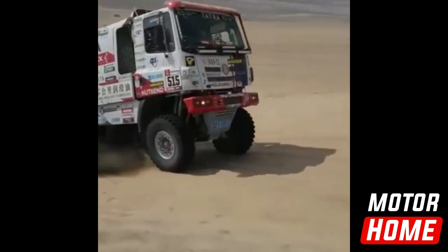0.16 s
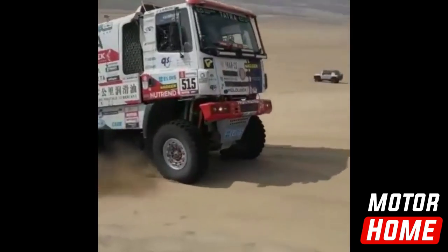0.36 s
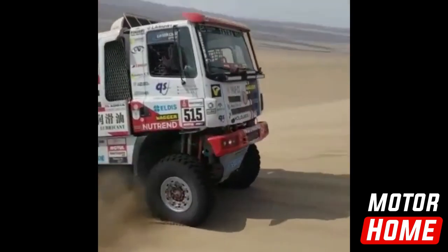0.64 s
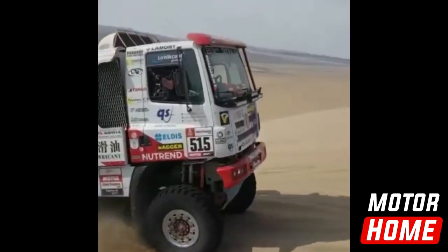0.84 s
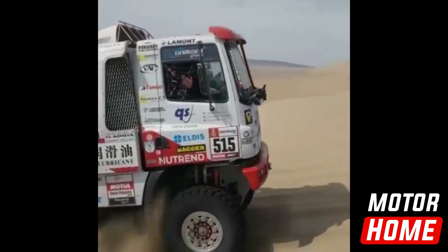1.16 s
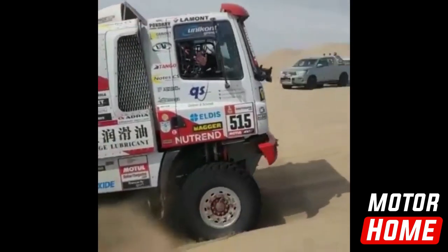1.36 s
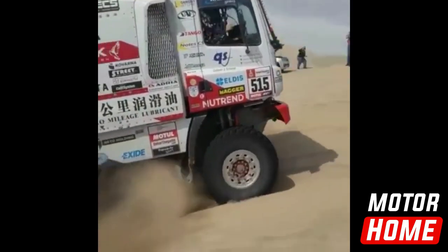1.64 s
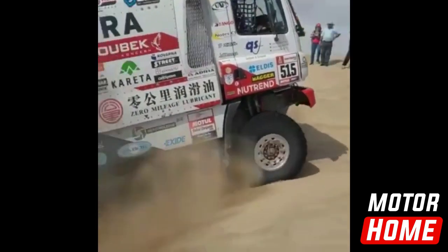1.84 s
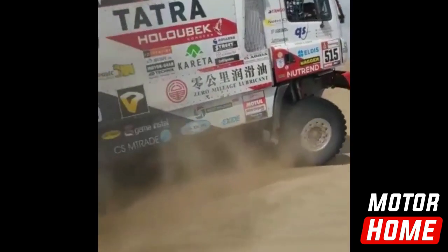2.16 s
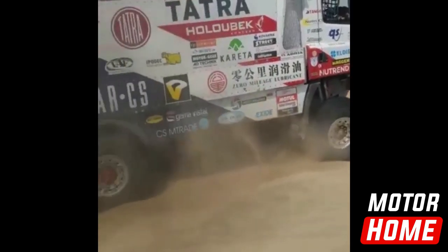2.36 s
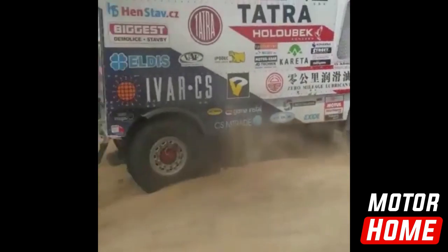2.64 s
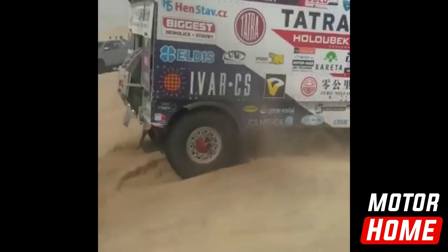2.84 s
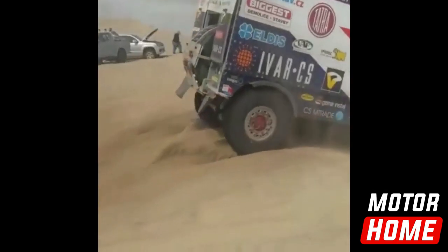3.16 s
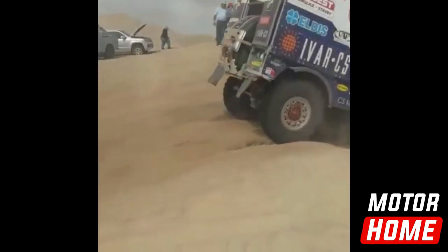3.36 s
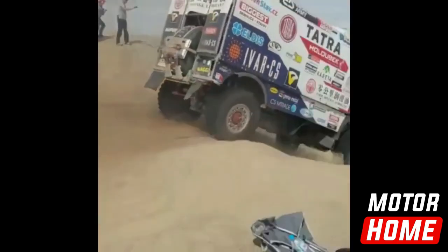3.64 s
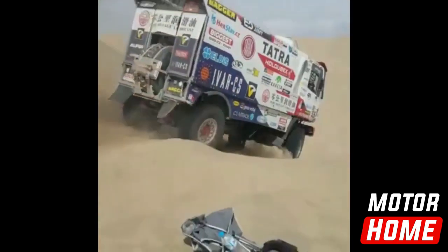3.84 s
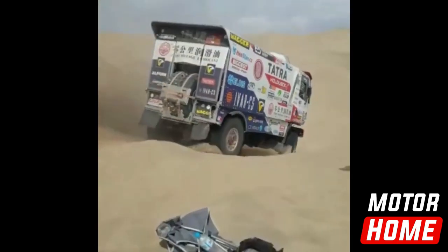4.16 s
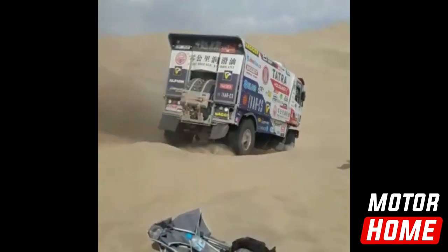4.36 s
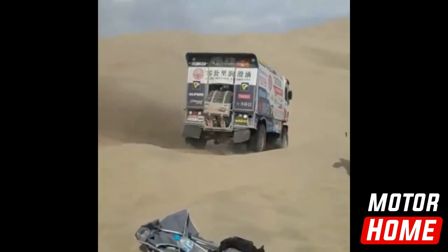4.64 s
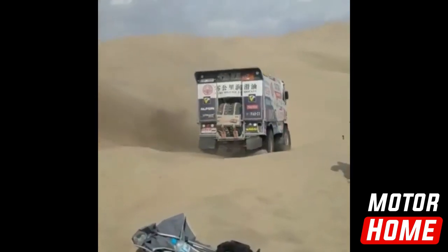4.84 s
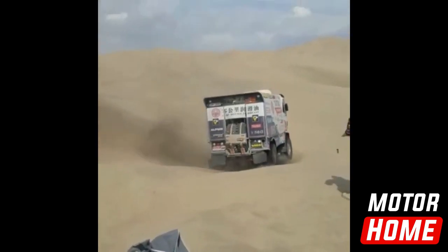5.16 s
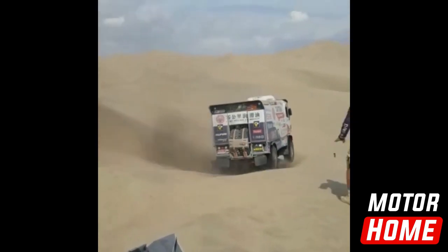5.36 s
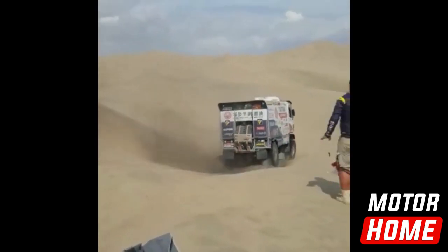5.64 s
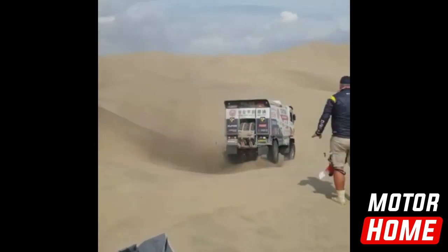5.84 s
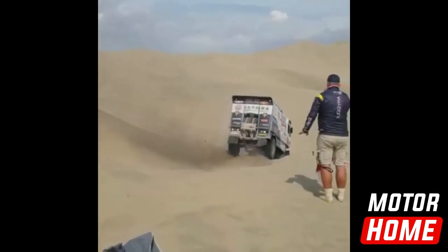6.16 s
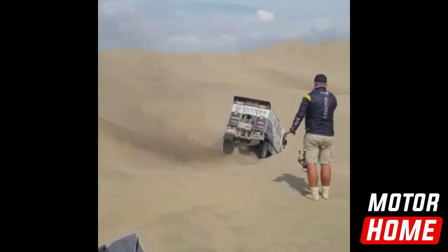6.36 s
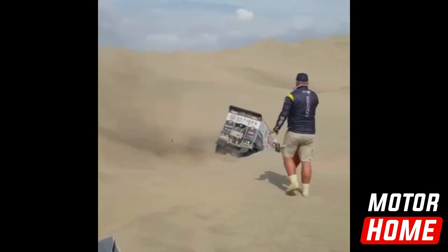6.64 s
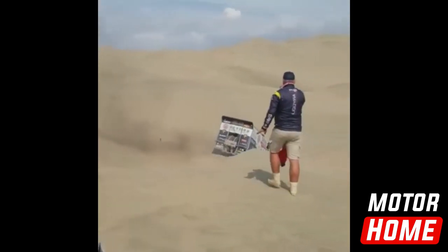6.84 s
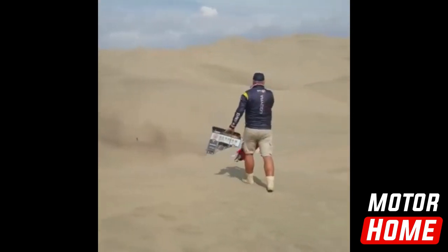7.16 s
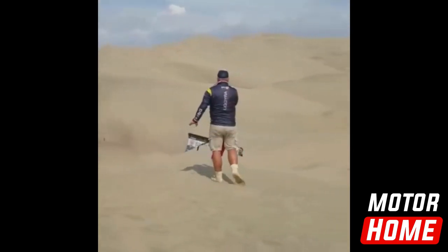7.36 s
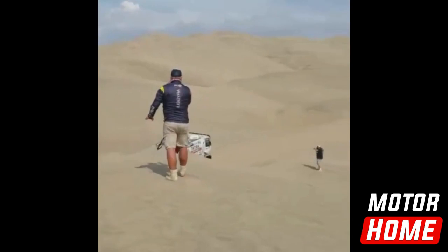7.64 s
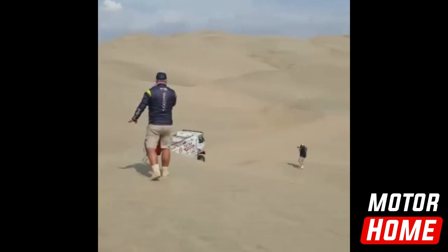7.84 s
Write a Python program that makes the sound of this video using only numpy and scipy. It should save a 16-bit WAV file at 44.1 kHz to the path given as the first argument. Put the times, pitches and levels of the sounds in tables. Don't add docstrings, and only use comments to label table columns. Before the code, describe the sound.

Open dunes, dry air, a phone microphone close to a passing heavy diesel truck. From 0 to 1.3 s the engine pulls hard, a buzzing drone that dips then climbs, with wavering gear whine and gas hiss. The throttle lifts and pitch falls; a short stab at 1.5-1.9 s, then it sinks to a low chug around 2.5 s. At 2.6-3.2 s a sudden stamp spits crackling, separate exhaust beats; a sharper one follows at 3.6-4.1 s with faint turbo whistle, and a smoother surge at 4.4-4.9 s. Metal squeaks around 4.85-5 s as strong wind slaps batter the left side. After 5.3 s the engine nearly vanishes; fine sand sifts and faintly sings, strongest about 6.3-7 s. From 7.05 s the distant engine revs upward and holds, weak beneath renewed left-heavy gusts and small snaps until 8 s. The treble is ragged and thinned.

```python
import sys
import numpy as np
from scipy import signal
from scipy.io import wavfile
from scipy.ndimage import uniform_filter1d

SR = 44100
rng = np.random.default_rng(int(sys.argv[2]) if len(sys.argv) > 2 else 0)


def magnitude_from_level(level_db):
    exponent = np.asarray(level_db, float) / 20
    return 10 ** exponent


def wav_record(signal):
    frames = np.transpose(np.atleast_2d(signal))
    bounded = np.clip(frames, -1, 1)
    quanta = np.round(bounded * 32767).astype(np.int16)
    wavfile.write(sys.argv[1], SR, quanta)


N = 352800

# (time [s], firings [Hz])
ENGINE_SPEED = [(0.0, 91.3), (0.08, 94.77), (0.48, 84.4), (0.66, 91.9), (0.81, 104.7), (0.97, 110.6),
                (1.23, 110), (1.39, 98.06), (1.52, 72.44), (1.58, 62.6), (1.75, 67.43), (1.96, 78.5),
                (2.25, 47), (2.5, 40.4), (2.7, 46.9), (2.82, 50.1), (3.09, 50.1), (3.18, 47.4), (3.36, 40),
                (3.6, 47.6), (3.8, 56.13), (4.0, 66.3), (4.17, 60.1), (4.31, 53.65), (4.48, 61.16),
                (4.65, 70.25), (4.92, 73.84),
                (5.3, 68.3), (6.2, 60.86), (7.04, 75.03), (7.24, 85.94), (7.5, 91.05), (7.62, 97.1),
                 (7.7, 102.4), (7.79, 107.2), (8.0, 106)]
# (down [s], up [s], time to open [s], exhaust on opening [dB], exhaust at the lift [dB])
THROTTLE = [
    (-0.1, 1.269, 0.049, -12.5, -18.5),
    (1.538, 1.944, 0.04, -28.5, -20.5),
    (2.626, 3.181, 0.014, -22.5, -23.5),
    (3.605, 4.065, 0.0078, -26.5, -24),
    (4.377, 4.88, 0.066, -19, -17),
    (7.053, 8.092, 0.098, -28.5, -31),
]
# (time [s], level [dB])
IDLE_LEVEL = [(1.45, -29.5), (1.54, -31.5), (1.9, -32.5), (2.4, -29.5), (2.62, -30), (3.32, -33),
              (3.39, -30.5), (3.45, -33), (3.55, -29.5), (4.2, -26.5), (4.3, -30.5), (4.37, -27.5),
              (5.0, -23.5), (5.3, -42.5), (5.8, -57), (7.0, -52)]
DRONE_RELEASE_S, GAS_RELEASE_S = 0.13, 0.15
# (pitch [Hz], level [dB])
PIPE_TONE = [(40, -7), (52, -12), (65, -4), (80, -2.5), (105, 1.9), (150, 1), (175, 5), (225, -0.5)]
# (time [s], second tone [dB], third tone relative to the second [dB])
PIPE_HEADING = [(0, -4, -19.5), (2.5, -1.2, -11.5), (3.7, 1.5, -30), (4.4, -2.5, -10), (4.9, -3, -14),
                (5.2, -0.5, -5.5), (7.2, -4.5, -18), (7.5, -10.5, -21), (8, -3, -15)]

# (pitch [Hz], level [dB])
ROAR_COLOUR = [(120, -10), (250, 0), (370, -13), (500, -6), (750, -6.5), (1100, -15), (1500, -3.5),
               (2200, -12), (3500, -38.5)]
ROAR_DB, FAR_ROAR_DB = -8, -50
ROAR_JET_SHARE = 0.46
# (time [s], hiss over exhaust [dB], how far firings chop it [0-1], its top end [dB])
GAS_JET = [(0, -11.5, 0.31, -24.5), (0.6, -2.5, 0.39, -29.5), (0.95, 0, 0.12, -24), (1.34, 2, 0.35, -28.5),
           (1.5, 3, 0.4, -22.5), (1.7, 1.5, 0.8, -23), (1.9, -1, 0.4, -26.5), (2.5, -3, 0.98, -21),
           (3.08, -9, 0.3, -21), (3.3, -5.5, 0.4, -22.5), (3.7, -3.5, 0.42, -26), (3.86, -1, 0.2, -22.5),
           (4.05, -5.5, 0.13, -22), (4.5, -8.5, 0, -25), (5.0, -14.5, 0.05, -18.5), (5.5, 5, 0, -20),
           (7.0, -26, 0.08, -15)]
IDLE_CHOP = 0.45
# (pitch [Hz], level [dB])
HISS_LEFT = [(900, -9.5), (1500, -12), (2600, -6), (3300, -0.5), (3900, -0.5), (4800, -9), (5700, -17.5),
             (6300, -52.5), (8000, -81)]
HISS_RIGHT = [(900, -11.5), (1500, -16), (2200, -8.5), (3000, -19.5), (4000, -11.5), (5000, -13),
              (5700, -17.5), (6300, -20.5), (8000, -64)]
# (pitch [Hz], level [dB])
TOP_LEFT = [(4300, -19), (4900, 8), (5500, 9.5), (6500, 7.5), (8000, 4.5), (10000, 0.5), (11200, 1.5),
            (12500, -2.5), (14000, -95)]
TOP_RIGHT = [(4300, -38), (4900, -4), (5500, 12.5), (6500, -54), (8000, 1.5), (10000, 3), (11200, -9),
             (12500, 8.5), (14000, -35)]
CRACK_TIMES = [
    2.644,
    2.788,
    2.985,
    3.584,
    3.83,
]
CRACK_LEVELS = [4.2, 0.31, 2.7, 5.6, 1.9]
CRACK_FADE_S = 0.043
# (time [s], extra level [dB])
SPITS = [(2.624, -3), (2.644, 2.5), (2.669, 3), (2.688, 6.5), (2.709, 1), (2.728, 4), (2.749, 6.5),
         (2.77, -9), (2.791, -0.5), (2.808, 3.5), (2.828, -2), (2.849, -2), (2.868, 4), (2.889, 0.1),
         (2.908, 0), (2.928, 5.5), (2.948, 4.5), (2.967, 2), (2.985, 7.5), (3.006, 8.5), (3.024, 5),
         (3.041, 11.5), (3.063, 5), (3.082, 7), (3.099, 1), (3.586, -1), (3.605, 9), (3.625, 3), (3.644, 5),
         (3.667, 6.5), (3.686, 2), (3.703, 7.5), (3.723, 4), (3.744, 4), (3.758, 1), (3.778, 4),
         (3.797, 3.5), (3.814, 9), (3.831, 2), (3.85, 8.5), (3.866, 3), (3.884, 8), (3.899, 1), (3.917, 6),
         (3.933, 6.5), (3.95, -2), (3.964, 6), (3.98, 4), (3.995, -5), (4.01, 10), (4.041, 0)]
SPIT_FADE_S = 0.0085

# (time [s], gears [dB], panel pitch [Hz], panel [dB])
GEARS = [(0, -64, 400.3, -23), (0.35, -30.5, 382.2, -26), (0.5, -33, 404, -25.5), (0.68, -25.5, 421, -29),
         (0.85, -31.5, 474, -31.5), (1.25, -31.5, 477.4, -31.5), (1.42, -48, 479.2, -72),
         (1.55, -59, 282, -38.5), (1.65, -41, 299.8, -27), (1.75, -38.5, 309, -53),
         (1.95, -41.5, 322.6, -59), (2.05, -40.5, 316, -60), (2.3, -76, 316, -72), (3.7, -70, 537, -60),
         (3.85, -58, 550, -29), (4.0, -57, 559, -46), (4.38, -63, 534, -66), (4.5, -46, 530, -27.5),
         (4.7, -43, 558.4, -33.5), (4.9, -42, 560, -37), (5.0, -70, 563, -67), (7.1, -72, 337, -59),
         (7.2, -46, 342.4, -34), (7.4, -53, 350, -35), (7.5, -44, 351, -55), (8, -54, 352.6, -55)]
# (pitch [Hz], level [dB])
GEAR_COLOUR = [(250, -4), (310, 7.5), (400, -15), (480, 1.5), (590, 0), (700, -7.5), (820, -6)]

# (time [s], left port [dB], right port [dB], share of low rumble [dB])
BREEZE = [(0.0, -27, -51, 0), (1.1, -44.5, -52, -7), (1.5, -31.5, -36, 4), (2.6, -33, -33, -2.5),
          (3.4, -31, -28.5, -2), (4.85, -26.5, -32, -1), (5.05, -27, -33, 4.5), (5.2, -38, -29, 3),
          (5.35, -28.5, -32.5, -1), (5.9, -38, -41.5, -10.5), (6.7, -31, -37, -5.5), (8, -23.5, -27, -4)]
# (peak [s], width [s], left port [dB], right minus left [dB])
GUSTS = [(0.237, 0.13, -19, -15), (1.671, 0.071, -43, -4.5), (1.78, 0.12, -23, -2),
         (2.001, 0.097, -43, -15), (2.44, 0.13, -36, -18), (2.701, 0.11, -17.5, -6),
         (2.92, 0.048, -19, -11), (3.0, 0.097, -42, 7), (3.17, 0.13, -18.5, -8), (3.252, 0.12, -24.5, -25),
         (3.5, 0.082, -43, -1), (3.61, 0.083, -15, -1), (3.81, 0.13, -24.5, -20), (4.002, 0.1, -14, -8),
         (4.169, 0.065, -19, -30), (4.49, .2, -17.5, -10), (4.769, 0.14, -24.5, -6), (4.92, 0.14, -43, -13),
         (5.072, 0.26, -6.5, -33), (5.24, 0.073, -19.5, -0.5), (5.56, 0.089, -52, -25),
         (6.09, 0.093, -58, -15), (6.521, 0.43, -32, -5), (6.74, 0.18, -20.5, -1.5),
         (7.0, 0.14, -23.5, -4.5), (7.17, 0.29, -29, 0.5), (7.359, 0.077, -18.5, -15),
         (7.641, 0.11, -25, 2.5), (7.76, 0.086, -18, -25), (7.951, 0.096, -14, -16)]
# (from [s], to [s], level [dB])
LULLS = [
    (2.6, 2.642, -10),
    (3.565, 3.584, -10),
    (5.024, 5.04, -11),
    (5.062, 5.092, -16),
    (5.11, 5.122, -11),
    (5.134, 5.147, -11),
    (5.178, 5.29, -14),
    (7.062, 7.125, -10),
]
# (pitch [Hz], level [dB])
WIND_COLOUR = [(60, -25), (150, -2), (250, 1.5), (420, -1), (700, -8), (1200, -20), (2500, -25.5),
               (5000, -100.5)]
RUMBLE_COLOUR = [(15, -12), (40, -13), (90, -5), (160, -16), (300, -24.5)]
WIND_ALIKE = 0.21
# (time [s], peak on the left [dB], right minus left [dB])
SLAPS = [(2.256, -25, -21), (2.645, -11, -1), (2.709, -7, -3), (2.762, -3, -27), (2.908, -14, 0),
         (2.933, -7, -11), (3.175, -15, -22), (3.267, -3.5, -25), (3.558, -7, -26), (3.585, -3, -9),
         (3.606, -9, -1), (3.627, -9, -2), (4.025, 4, -35), (4.184, -8, -20), (4.481, -9.5, -5),
         (4.909, -3, -6), (4.96, -8, -23), (4.978, -17, -19), (5.01, 3, -24), (5.016, 5, -26),
         (5.044, 4.5, -22), (5.052, -4.5, -25), (5.083, -7, -25), (5.095, -17, -25), (5.102, -1, -42),
         (5.127, 4, -36), (5.149, -4, -32), (5.157, -13, -25), (5.639, -18, -17), (5.678, -18, -13),
         (6.334, -25, -11), (6.526, -20, -14), (6.575, -25, 10), (6.629, -13.5, -5), (6.691, -24, -25),
         (6.711, -23, 14), (6.781, -34, -8), (6.798, -4.5, -6), (7.049, -16, -15), (7.28, -14.5, -5),
         (7.351, -15, -14), (7.477, -16.5, -3), (7.508, -23, 4), (7.528, -15, -3), (7.634, -11, -12),
         (7.664, -15, -12), (7.745, -7, -7), (7.767, -14, -26), (7.791, -23, -10), (7.871, -15, -8),
         (7.935, -9, -4)]
# (time [s], peak on the left [dB], right minus left [dB])
SNAPS = [(3.585, -14, -22), (4.481, -28, -12), (5.0105, 1, -25), (5.045, -9, -25), (5.052, -11, -25),
         (5.097, -5, -27), (5.102, 0.5, -33), (5.149, -22, -31), (5.158, 0.5, -34), (5.679, -18, -17),
         (6.334, -25, -9), (6.798, -28, -8), (7.349, -20, -10), (7.477, -36, -5), (7.51, -31, -3),
         (7.53, -32, -7), (7.633, -23, -9), (7.746, -30, -13), (7.761, -22, -8), (7.79, -8, -17),
         (7.871, -24, -8)]
# (pitch [Hz], level [dB])
SLAP_COLOUR = [(100, 8.5), (300, -6), (700, 1.5), (1200, -5), (2200, -22), (4000, -57)]
SNAP_COLOUR = [(100, -9), (400, -7), (1200, -2), (2500, -7), (4000, -11.5), (6000, -36)]
SLAP_S, SNAP_S, PUSH_SIZE = 0.00073, 0.00009, 0.29
SMALL_SLAPS, SMALL_SLAP_DB, SMALL_SPREAD_DB = 30, -11, -4

# (pitch [Hz], width [Hz])
CANCELLED = [(1620, 305), (2130, 210)]
# (time [s], strength [0-1])
ECHO = [(1.8, 0), (2.6, 0.75), (3.6, 0.66), (5, 0.4), (5.4, 0.49), (6.9, 0.48), (7.4, 0.2)]
# (time [s], pitch [Hz], level [dB])
TURBO = [(2.55, 9400, -79), (2.66, 9740, -46), (2.9, 9360, -55), (3.09, 9470, -43), (3.17, 9800, -60),
         (3.25, 9700, -46.5), (3.29, 9600, -75), (3.5, 8680, -62), (3.61, 8520, -51), (3.78, 8380, -53),
         (3.85, 8640, -35.5), (3.98, 8960, -51), (4.08, 8900, -46.5), (4.19, 8640, -69), (4.42, 8130, -57),
         (4.57, 8690, -49.5), (4.75, 9430, -59), (4.9, 9820, -69)]
# (time [s], pitch [Hz], level [dB], length [s])
SQUEAKS = [
    (4.85, 3580, -25, 0.033),
    (4.998, 3630, -29, 0.015),
    (5.417, 3480, -43, 0.034),
    (5.509, 2560, -45, 0.028),
]
# (time [s], level [dB], left minus right [dB])
SAND = [(5.17, -49, 5), (5.551, -42.5, 1), (5.94, -46.5, 1), (6.25, -41.5, 4.5), (6.399, -37, 3),
        (6.5, -33, 1.5), (6.679, -38, 2), (6.919, -33.5, 2), (7.15, -41, 3.5), (7.49, -69, -15),
        (8.0, -52, -1)]
# (pitch [Hz], level [dB])
SAND_COLOUR = [(880, -16), (1300, -2), (1600, -7), (1850, -0.5), (2150, -9.5), (2440, -5), (2800, -9.5),
               (3500, -6), (4810, -2.5), (6600, -14), (8110, -12.5), (12200, -25), (13900, -63)]
# (time [s], pitch [Hz], level over the sand hiss [dB])
SINGING = [(6.05, 4400, -13), (6.2, 4500, 1), (6.29, 4400, -11), (6.34, 5110, 3), (6.49, 3840, -6.5),
           (6.57, 4700, -11), (6.72, 4600, -2), (6.8, 3930, -4), (6.9, 3680, -2), (7.08, 3657, -7),
           (7.3, 3750, -17)]

# (time [s], pitch [Hz])
KEPT = [(0, 13300), (2.3, 13193), (2.55, 10800), (2.65, 11898), (4.05, 11896), (4.15, 11302), (4.4, 12100),
        (5.3, 12500), (7.2, 12596), (7.4, 12000), (8, 12000)]
# (pitch [Hz], level [dB])
EMPTY = [(900, -13.5), (1500, -6.5), (2500, -5), (4000, -5), (5500, 3.5), (7500, 2), (9000, 0.5),
         (11000, 3), (12500, 0.5)]
# (pitch [Hz], how rarely [spreads of chance])
DROPPED = [(4500, 3.0), (5200, 2.2), (5500, 1.6), (5900, 1.5), (6600, 1.1), (7600, 0.8), (8300, 1.9),
           (9700, 1.7), (10300, 0.5), (11300, -0.2), (12100, 1.6), (13000, 1.6)]
BAND_HZ, RARER_PER_DB = 345, 0.004
# (from [s], to [s], pitch [Hz], treble level [dB])
CRACKLING = [
    (2.63, 2.76, 12000, -3.5),
    (2.76, 3.107, 8800, -4),
    (3.575, 3.61, 12800, -1.5),
    (3.61, 4.06, 9050, -0.5),
]


def evened(x):
    return x / np.sqrt(np.mean(x ** 2) + 1e-20)


def columns(rows):
    s, *values = np.transpose(rows)
    return [np.interp(np.arange(N) / SR, s, v) for v in values]


def coloured(x, points):
    hz, db = np.transpose(points)
    grid = np.fft.fftfreq(4096, 1 / SR)
    log_gain = np.log(magnitude_from_level(np.interp(np.log(abs(grid) + 1), np.log(hz), db, -100, -100)))
    taps = np.fft.ifft(np.exp(np.conj(signal.hilbert(log_gain)))).real[:2048]
    return signal.oaconvolve(x, taps)[:N]


def drift(seconds):
    size = max(round(seconds * SR), 1)
    return evened(uniform_filter1d(uniform_filter1d(rng.standard_normal(N), size), size))


def both_ports(x, samples):
    return x, np.interp(np.arange(N) - 2 + samples * drift(0.17), np.arange(N), x)


def fuzzy(hz, seconds, steady):
    carrier = np.exp(2j * np.pi * np.cumsum(hz) / SR)
    wander = [steady + drift(seconds) + 1j * drift(seconds) for port in range(2)]
    return (carrier * wander).real


def effort(release_s):
    t, idle_db = np.arange(N) / SR, columns(IDLE_LEVEL)[0]
    down, up, rise, open_db, lift_db = np.transpose(THROTTLE)[:, :, None]
    opened = np.clip((t - down) / rise, 0, 1) * np.clip(1 - (t - up) / release_s, 0, 1)
    full_db = open_db + (lift_db - open_db) * np.clip((t - down) / (up - down), 0, 1)
    level_db = idle_db + (opened * (full_db - idle_db)).max(axis=0)
    return level_db, opened.max(axis=0)


def crank():
    hz = uniform_filter1d(columns(ENGINE_SPEED)[0], size=2000)
    firings = np.cumsum(hz * (1 + 0.01276 * drift(0.0084))) / SR
    level_db = effort(DRONE_RELEASE_S)[0]
    pipe_hz, pipe_db = np.transpose(PIPE_TONE)
    first_db, second_db = (level_db + np.interp(np.log(k * hz), np.log(pipe_hz), pipe_db) for k in (1, 2))
    at = (np.transpose(SPITS)[0] * SR).astype(int)
    early = np.interp(np.arange(N), at, np.unwrap(firings[at] % 1, period=1))
    return firings - early, first_db, second_db + columns(PIPE_HEADING)[0]


def puffs(firings, spread_db, fade):
    strength = magnitude_from_level(spread_db * rng.standard_normal(2000))[firings.astype(int)]
    return evened(uniform_filter1d(strength * np.exp(-(firings % 1) / fade), size=80))


def cracks_db():
    since = np.arange(N) / SR - np.array(CRACK_TIMES)[:, None] + 0.004
    fade = (since > 0) * np.exp(-abs(since) / CRACK_FADE_S)
    return (np.array(CRACK_LEVELS)[:, None] * fade).sum(axis=0)


def spits_db():
    s, db = np.transpose(SPITS)
    kicks = np.bincount((s * SR).astype(int), db, N)
    fading = signal.lfilter([1], [1, -np.exp(-1 / (SPIT_FADE_S * SR))], kicks)
    return uniform_filter1d(fading, size=150)


def exhaust(firings, first_db, second_db):
    turn = 2 * np.pi * (uniform_filter1d(firings, size=1300) - 0.1)
    wobble = magnitude_from_level(1.6 * drift(0.006))
    third_db = second_db + columns(PIPE_HEADING)[1]
    tones = -magnitude_from_level(first_db) * np.cos(turn)
    tones -= magnitude_from_level(second_db) * np.cos(2 * turn + 1.1)
    tones += magnitude_from_level(third_db) * np.cos(3 * turn)
    drone = signal.filtfilt(*signal.butter(2, 30, 'high', fs=SR), wobble * tones)
    return np.sqrt(2) * drone * magnitude_from_level([[0.1], [-0.1]])


def roar(firings):
    knock = sum(magnitude_from_level(-3.0 * (k % 2)) * np.cos(np.pi * k * firings + k ** 2) for k in range(7, 26))
    gate = 0.4 + puffs(firings, 3.0, 0.4)
    shared = both_ports(0.5 * evened(knock) + gate * rng.standard_normal(N), 2.7)
    ports = [coloured(x + gate * rng.standard_normal(N), ROAR_COLOUR) for x in shared]
    level_db = effort(GAS_RELEASE_S)[0] + ROAR_DB + ROAR_JET_SHARE * columns(GAS_JET)[0]
    level_db += 0.8 * cracks_db() + 0.6 * spits_db()
    return np.hypot(magnitude_from_level(level_db), magnitude_from_level(FAR_ROAR_DB)) * evened(np.array(ports)) * magnitude_from_level([[1.5], [-1.5]])


def hiss(firings):
    level_db, opened = effort(GAS_RELEASE_S)
    jet_db, chop, top_db = columns(GAS_JET)
    crack_db, spit_db = cracks_db(), spits_db()
    level_db = level_db + jet_db + crack_db + spit_db
    top_db = top_db + 0.45 * crack_db + 0.6 * spit_db
    chop = np.clip(chop * (IDLE_CHOP + (1 - IDLE_CHOP) * opened) + 0.027 * crack_db, 0, 1)
    spit = puffs(firings, 1.5, 0.28)
    gate = np.sqrt(1 - chop + chop * spit ** 2) * magnitude_from_level(0.6 * drift(0.033))
    gas = gate * (both_ports(rng.standard_normal(N), 2.2) + 0.6 * rng.standard_normal((2, N)))
    body = np.array([coloured(x, c) for x, c in zip(gas, (HISS_LEFT, HISS_RIGHT))])
    top = np.array([coloured(x, c) for x, c in zip(gas, (TOP_LEFT, TOP_RIGHT))])
    return magnitude_from_level(level_db + 3.0) * (evened(body) + magnitude_from_level(top_db + 9.5) * evened(top))


def gears(firings):
    gear_db, panel_hz, panel_db = columns(GEARS)
    rate = uniform_filter1d(np.gradient(firings) * SR, size=2000)
    ring_hz, ring_db = np.transpose(GEAR_COLOUR)
    whine = 0
    for order in np.arange(4, 8) + 1 / 3:
        level = magnitude_from_level(np.interp(order * rate, ring_hz, ring_db) + 1.5 * drift(0.0076))
        whine = whine + level * np.cos(2 * np.pi * order * firings + 1.22 * drift(0.016))
    carrier = np.exp(2j * np.pi * np.cumsum(panel_hz) / SR)
    panel = (carrier * (drift(0.0026) + 1j * drift(0.0057))).real
    return np.sqrt(2) * magnitude_from_level(gear_db) * whine + magnitude_from_level(panel_db) * panel


def gusting():
    s, width, left_db, right_db = np.transpose(GUSTS)[:, :, None]
    bells = np.exp(-(1.9 * (np.arange(0, N, 64) / SR - s) / width) ** 2)
    swells = [np.repeat((magnitude_from_level(db) * bells).sum(axis=0), 64)[:N] for db in (left_db, left_db + right_db)]
    return magnitude_from_level(np.array(columns(BREEZE)[:2])) + swells


def wind(pressure):
    left, other = [rng.standard_normal(N) * magnitude_from_level(3.5 * drift(0.004) + 2.8 * drift(0.012)) for port in range(2)]
    lumps = left, WIND_ALIKE * left + np.sqrt(1 - WIND_ALIKE ** 2) * other
    swirls = evened(np.array([coloured(x, WIND_COLOUR) for x in lumps]))
    rumble = evened(np.array([coloured(x, RUMBLE_COLOUR) for x in lumps]))
    t = np.arange(N) / SR
    lull_db = sum(db * ((t > a) & (t < b)) for a, b, db in LULLS).astype(float)
    lull = magnitude_from_level(uniform_filter1d(lull_db, size=300))
    return pressure * magnitude_from_level(-6.0) * (swirls + magnitude_from_level(columns(BREEZE)[2]) * rumble) * lull


def pushes(rows, seconds, colour, rough):
    s, db, right_db = np.transpose(rows)
    u = np.arange(300) / SR / seconds
    one_way = PUSH_SIZE * rng.choice([-1, 1], (len(s), 1)) * (2 - u)
    ragged = rough * rng.standard_normal((len(s), len(u))) + one_way
    bursts = magnitude_from_level(db)[:, None] * u * np.exp(1 - u) * ragged
    at = np.minimum(np.round(s * SR).astype(int)[:, None] + np.arange(300), N - 1).ravel()
    ports = [np.bincount(at, (bursts * gain).ravel(), N) for gain in (1, magnitude_from_level(right_db)[:, None])]
    return np.array([coloured(x, colour) for x in ports])


def slaps(pressure):
    small_s = rng.uniform(2, 7.98, SMALL_SLAPS)
    gust = np.minimum(pressure, 0.05)[(small_s * SR).astype(int)]
    small_db = 20 * np.log10(gust) + SMALL_SLAP_DB + SMALL_SPREAD_DB * rng.standard_normal(SMALL_SLAPS)
    dull = np.vstack([SLAPS, np.transpose([small_s, small_db, 0 * small_s - 20])])
    snaps = magnitude_from_level(14.0) * pushes(SNAPS, SNAP_S, SNAP_COLOUR, 0.13)
    return magnitude_from_level(6.5) * pushes(dull, SLAP_S, SLAP_COLOUR, 0.56) + snaps


def ground(x):
    bands = sum(signal.lfilter(*signal.iirpeak(hz, hz / width, SR), x) for hz, width in CANCELLED)
    return x - np.clip(columns(ECHO)[0], 0, 1) * bands


def turbo():
    hz, level_db = columns(TURBO + [(5.1, 9300, -93)])
    breath = fuzzy(hz, 0.0014, 0.6) * magnitude_from_level(3 * drift(0.011))
    return magnitude_from_level(level_db + 5.0) * breath * magnitude_from_level([[4.0], [-4.0]])


def squeaks():
    t = np.arange(N) / SR
    notes = 0
    for s, hz, db, length in SQUEAKS:
        swell = np.exp(-(2 * (t - s) / length) ** 4)
        notes = notes + magnitude_from_level(db) * swell * np.sin(2 * np.pi * hz * t)
    return notes * magnitude_from_level([[5.0], [-5.0]])


def sand():
    level_db, pan_db = columns([(4.9, -64, 4.9)] + SAND)
    ring_hz, ring_db = columns(SINGING)
    grains = both_ports(rng.standard_normal(N), 5.1) + 0.9 * rng.standard_normal((2, N))
    grains = [coloured(x * magnitude_from_level(1.8 * drift(0.014) + 0.41 * drift(0.051)), SAND_COLOUR) for x in grains]
    singing = fuzzy(ring_hz, 0.0012, 0)
    return magnitude_from_level(level_db + np.outer([0.5, -0.5], pan_db)) * (evened(np.array(grains)) + magnitude_from_level(ring_db) * singing)


def scene():
    firings, first_db, second_db = crank()
    truck = exhaust(firings, first_db, second_db) + roar(firings) + hiss(firings) + gears(firings)
    truck = truck + turbo() + squeaks()
    pressure = gusting()
    return ground(truck + sand()) + wind(pressure) + slaps(pressure[0])


def thinned(x):
    shape = dict(fs=SR, window="cosine", nperseg=2048, noverlap=1024)
    hz, t, z = signal.stft(x, **shape)
    pitch = hz[:, None]
    chance = rng.standard_normal((2, len(hz), len(t)))
    ragged, swell = evened(uniform_filter1d(uniform_filter1d(chance, size=12, axis=1), size=3, axis=2))
    around = uniform_filter1d(abs(z), size=45, axis=1)
    threshold = around * magnitude_from_level(np.interp(hz, *np.transpose(EMPTY))[:, None] + 5.6 * ragged)
    edge = np.interp(t, *np.transpose(KEPT)) + 450 * rng.standard_normal(len(t))
    kept = (abs(z) > threshold) & (pitch < np.minimum(edge, 13300))
    band = (hz // BAND_HZ).astype(int)
    luck = evened(uniform_filter1d(rng.standard_normal((band.max() + 1, len(t))), size=3, axis=1))[band]
    loudness = np.linalg.norm(z[0], axis=0)
    quiet_db = -20 * np.log10(loudness / loudness.max() + 1e-9)
    rarity = np.interp(band * BAND_HZ, *np.transpose(DROPPED))[:, None]
    kept &= luck < rarity + RARER_PER_DB * (quiet_db - 6)
    gain = np.where(kept, magnitude_from_level(1.8 * swell * (pitch > 900)), magnitude_from_level(-60))
    for start, end, top_hz, db in CRACKLING:
        spared = (t > start) & (t < end) & (pitch < top_hz)
        gain = np.where(spared, magnitude_from_level(db * (pitch > 5000)), gain)
    return signal.istft(z * gain, **shape)[1][:, :N]


def top_cut(x):
    return signal.sosfilt(signal.butter(12, 14070, fs=SR, output="sos"), x)


def record(dry):
    rounded = 0.85 * np.tanh(dry / 0.85)
    mix = thinned(rounded)
    return top_cut(mix)


dry = scene()
out = record(dry)
wav_record(out)
```